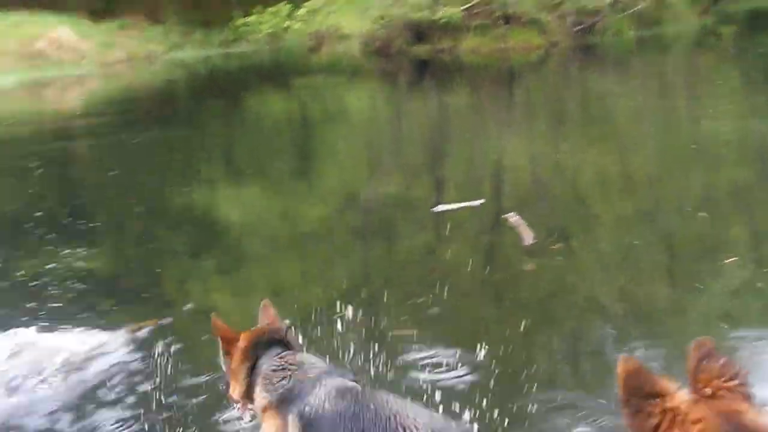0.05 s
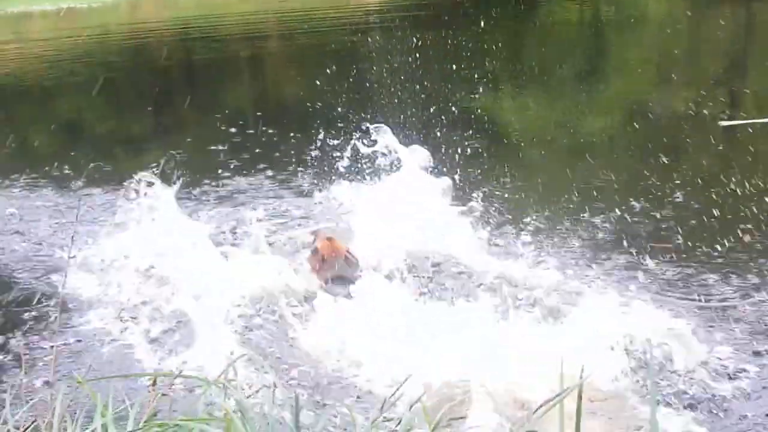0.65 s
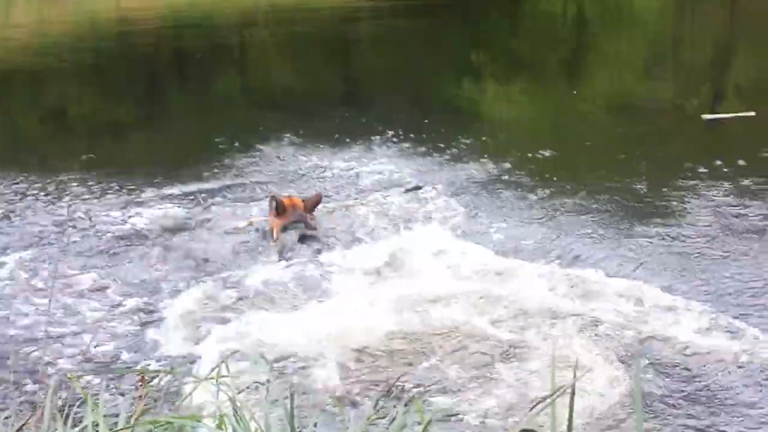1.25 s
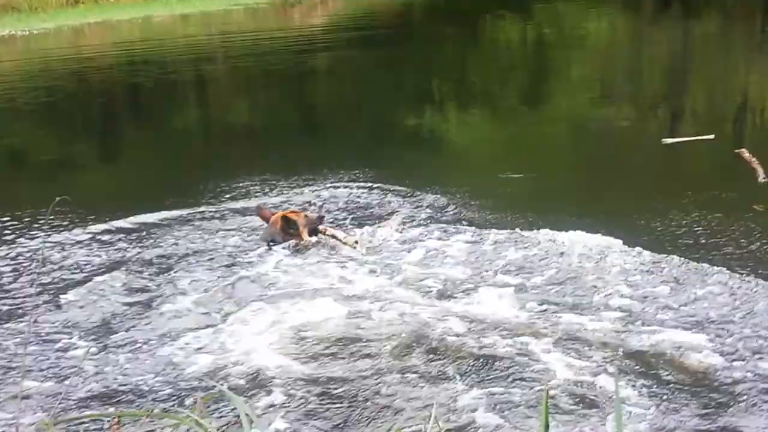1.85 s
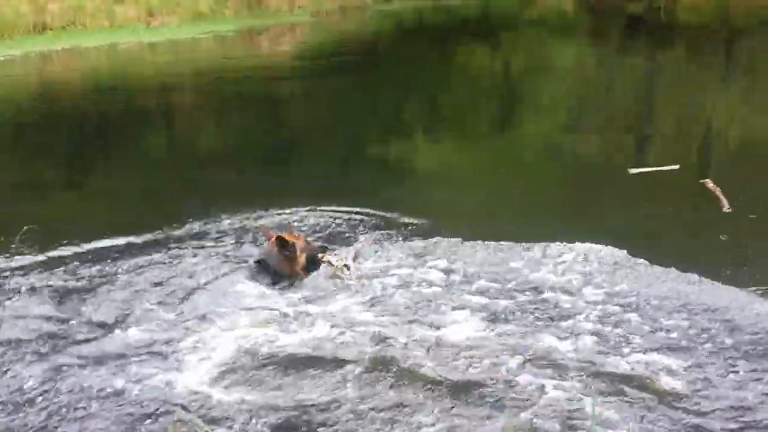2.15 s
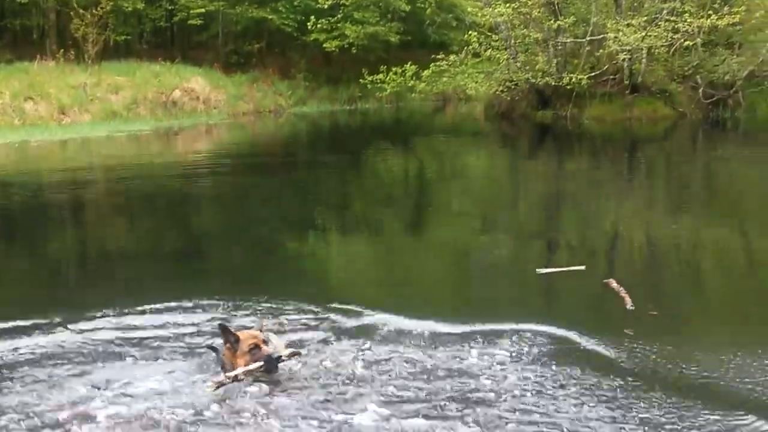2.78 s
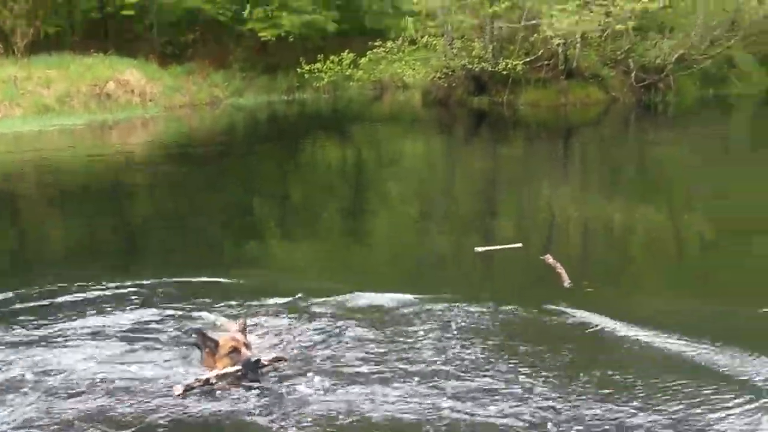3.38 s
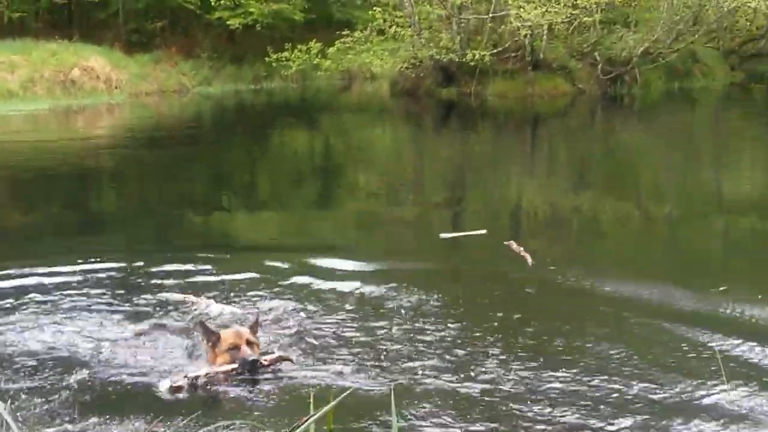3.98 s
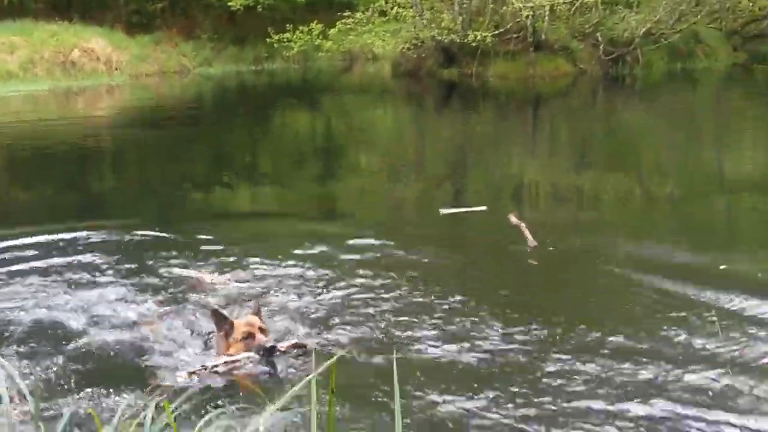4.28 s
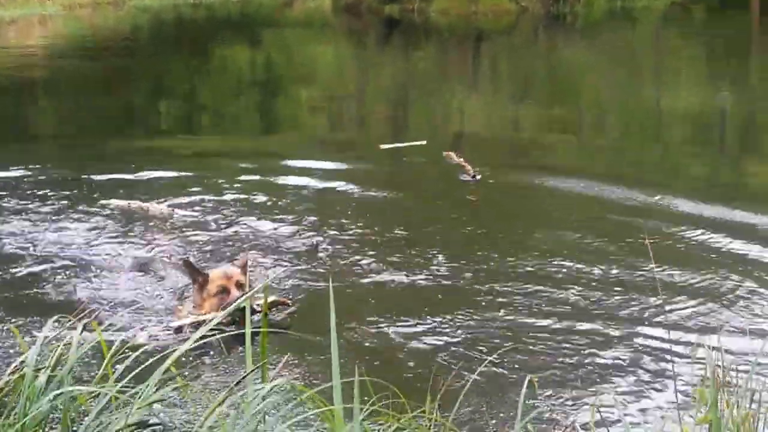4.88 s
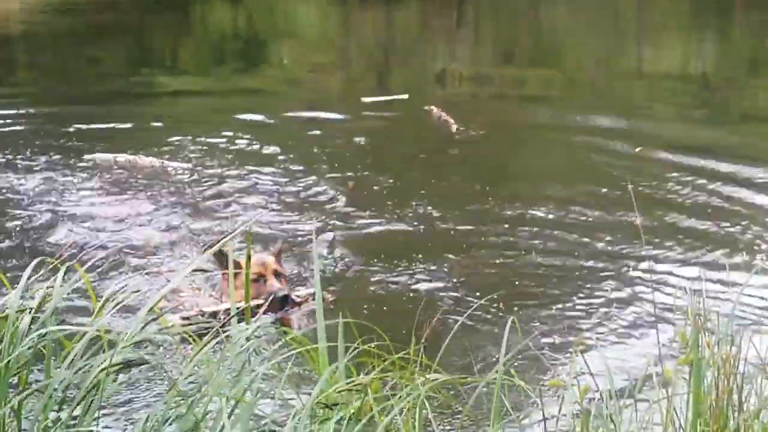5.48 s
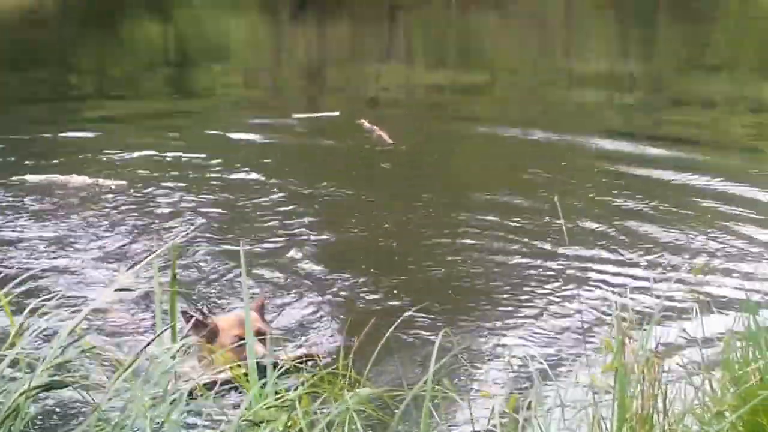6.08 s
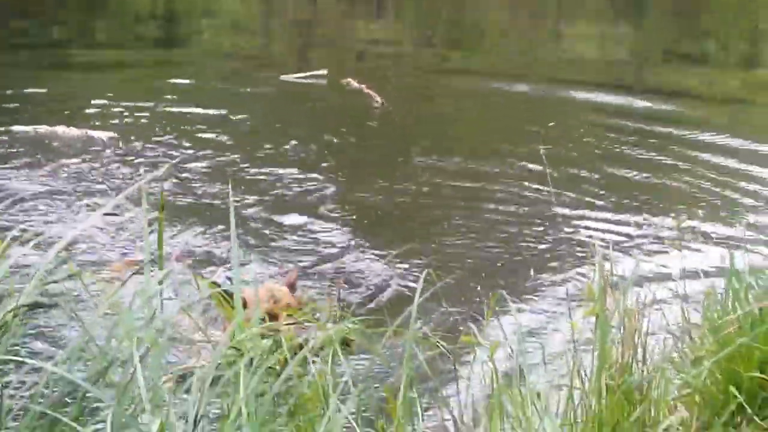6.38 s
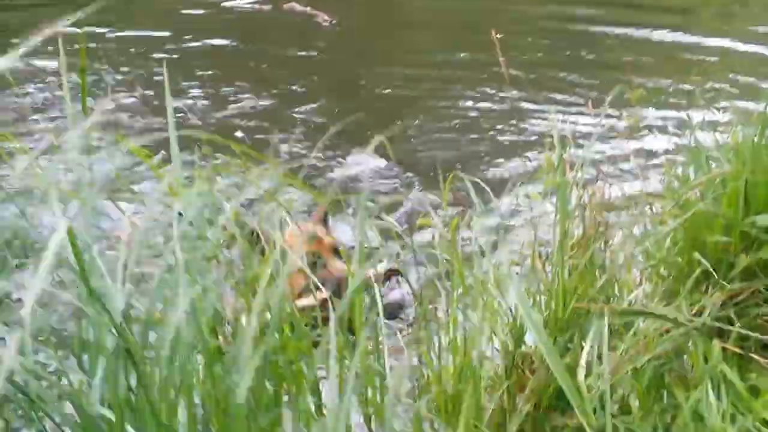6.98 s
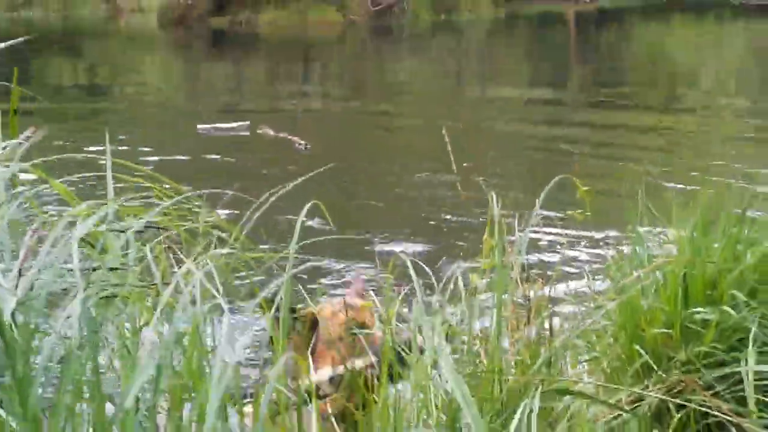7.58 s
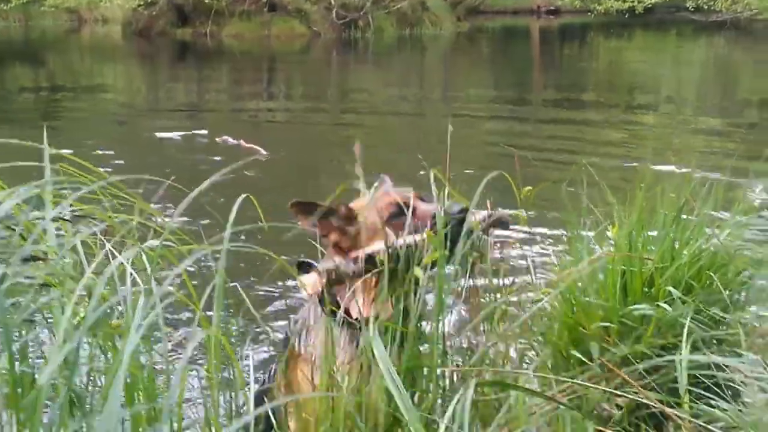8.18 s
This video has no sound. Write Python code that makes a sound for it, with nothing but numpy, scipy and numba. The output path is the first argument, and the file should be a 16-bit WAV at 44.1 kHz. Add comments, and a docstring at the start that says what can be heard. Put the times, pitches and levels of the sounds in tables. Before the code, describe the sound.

A dog plunges into a pond with a booming splash, then paddles back and sloshes through the shallows while distant birds whistle.

```python
"""A big, booming splash: a dog leaps into a forest pond, swims back and wades out through the reeds.
The plunge traps large air bubbles and throws up spray that patters down and fizzes away.
The wake laps, paws slap and gulp in the shallows, and two stems snap close by.
The water is mostly swarms of ringing bubbles and drops, swelling with each push of the dog.
Birds whistle far off over a soft rumble of forest air."""
import sys
import numpy as np
from scipy import signal
from scipy.fft import rfft, irfft, next_fast_len
from scipy.io import wavfile
from scipy.ndimage import map_coordinates
from numba import njit

SR = 44100
rng = np.random.default_rng(int(sys.argv[2]) if len(sys.argv) > 2 else 0)


def dump_mix(stems):
    """Bounce the given channels to the path in sys.argv[1] as a 16-bit WAV at rate SR."""
    frames = np.atleast_2d(stems).T  # one column per channel
    limited = np.clip(frames, -1, 1)  # hard clip at full scale
    pcm = np.round(limited * 32767).astype(np.int16)
    wavfile.write(sys.argv[1], SR, pcm)


N = 363516
TIME = np.arange(N) / SR


def amp(db):
    """Decibels to gain."""
    return 10 ** (np.asarray(db) / 20)


def unit(x):
    """Scales to rms 1."""
    return x / np.sqrt(np.mean(x ** 2) + 1e-20)


def eq_db(curve, hz):
    """Gain of an EQ curve, interpolated on a log-frequency axis."""
    freq_hz, gain_db = np.transpose(curve)
    return np.interp(np.log(hz + 1), np.log(freq_hz), gain_db)


def colour(x, curve):
    """Filters a sound through an EQ curve."""
    size = next_fast_len(x.shape[-1] + 512)
    gain = amp(eq_db(curve, np.fft.rfftfreq(size, 1 / SR)))
    return irfft(rfft(x, size) * gain, size)[..., :x.shape[-1]]


def add(mix, start_s, sound):
    """Mixes a sound in at a time."""
    part = mix[..., max(round(start_s * SR), 0):][..., :sound.shape[-1]]
    part += sound[..., :part.shape[-1]]


def wander(t, per_s):
    """A random drift of about unit size."""
    knots = rng.standard_normal(4096)
    return map_coordinates(knots, [t * per_s], order=1, mode="wrap")


def surge(t, start_s, rise_s, fall_db_per_s):
    """An envelope with a quick rise, then a steady fall in dB."""
    return np.clip((t - start_s) / rise_s, 0, 1) * amp(-fall_db_per_s * np.maximum(t - start_s, 0))


def forest_air(level_db=-55):
    """A soft, drifting rumble with a faint, wide hiss."""
    # tone of the distant air: freq_hz, gain_db
    air_eq = [(20, -22), (45, -5.5), (72, 6), (120, -1.5), (250, -8.5), (500, -11), (1000, -22),
              (2000, -16.5), (4000, -25), (8000, -28.5), (15000, -25.5)]
    centre = colour(rng.standard_normal(N), [(400, -4), (1500, 1.0), (4000, -10.5)])
    wide = colour(rng.standard_normal((2, N)), [(100, -2.5), (600, 7.5), (2000, 3.5)])
    return amp(level_db + 1.4 * wander(TIME, per_s=3.75)) * unit(colour(centre + wide, air_eq))


def forest_echo(x, t60_s):
    """Trunks and the far bank scatter a thin, dull stereo tail."""
    t = np.arange(SR) / SR
    taps = rng.standard_normal((2, SR)) * (rng.random((2, SR)) < .05)
    tail = taps * amp(-60 * t / t60_s) * (t > .012)
    tail = colour(tail, [(100, -9.0), (1000, 14.5), (5000, 13.5), (14000, -12)])
    return signal.fftconvolve(x[None], tail / np.linalg.norm(tail[0]), axes=1)[:, :N]


def twitter_notes(gap_s=.033, length_s=.0445, scatter=.16, glide=.12, buzz=.82):
    """Note rows for a bird's twitter: quick flicks up or down, scattered about a falling pitch."""
    # contour of the run: time_s, level_db, pitch_hz
    contour = [(2.33, -59.5, 4470), (2.85, -57.5, 4360), (3.1, -59, 4140), (3.25, -60.5, 3300),
               (3.85, -60, 3050), (4.2, -66, 2680)]
    time_s, level_db, pitch_hz = np.transpose(contour)
    beats = np.arange(time_s[0], time_s[-1], gap_s)
    late, detune, flick = rng.uniform(-1, 1, (200, 3))[:len(beats)].T
    starts = beats + late * gap_s / 2
    pitches = np.interp(beats, time_s, pitch_hz) * (1 + scatter * detune)
    return [(start_s, length_s, np.interp(start_s, time_s, level_db), hz * (1 + glide * way), hz, buzz)
            for start_s, hz, way in zip(starts, pitches, np.sign(flick))]


def birds():
    """Thin gliding whistles; a fast flutter of pitch makes some of them buzz."""
    # single calls: start_s, length_s, level_db, start_hz, end_hz, buzz (0-1)
    notes = [(3.37, .045, -54, 4340, 4620, 0.3), (3.565, 0.032, -52, 4390, 4570, 0.16),
             (3.774, .023, -51, 4500, 4620, .37), (3.81, 0.094, -57, 3660, 3500, 0.75),
             (4.295, 0.15, -62, 5420, 4850, 0.8), (4.537, .2, -58.5, 3220, 3440, 1),
             (4.985, 0.16, -54.5, 3850, 3510, 0.05), (5.14, 0.13, -60, 3540, 3470, 0.07),
             (5.18, .07, -67, 4970, 5100, 0.5), (5.31, .11, -67, 7450, 7050, .1)]
    out = np.zeros(N)
    for start_s, length_s, level_db, start_hz, end_hz, buzz in notes + twitter_notes():
        t = np.arange(int(length_s * SR)) / SR
        flutter = .07 * buzz * wander(t, per_s=700)
        glide_hz = end_hz + (start_hz - end_hz) * (1 - t / length_s) ** 3  # slides, then settles
        whistle = np.sin(2 * np.pi * np.cumsum(glide_hz * (1 + flutter)) / SR)
        add(out, start_s, amp(level_db) * unit(whistle * signal.windows.tukey(len(t), .6)))
    return out


def stem_snaps(lag_s=.0003, right_db=-4, tear_db=-7):
    """A stem on the left breaks: fibres tear in one dry crack that rings its modes for a moment."""
    # breaking stems: start_s, level_db
    snaps = [(7.0217, 1), (7.471, -4)]
    # modes of a stem: pitch_hz, level_db, t60_s
    modes = [(600, -35, 0.0034), (1690, -8, 0.0051), (4200, -24, .002), (5350, 1, 0.0021),
             (7500, 7.5, 0.0012), (10700, -14, 0.0016)]
    t, out = np.arange(600) / SR, np.zeros((2, N))
    ring = sum(amp(db - 60 * t / t60_s) * np.sin(2 * np.pi * hz * t) for hz, db, t60_s in modes)
    for start_s, level_db in snaps:
        tear = amp(tear_db) * rng.standard_normal(len(t)) * np.exp(-t / .00055)
        crack = amp(level_db) * (ring + tear) * (1 - np.exp(-t / .0001))
        add(out[0], start_s, crack)
        add(out[1], start_s + lag_s, amp(right_db) * crack)
    return out


def gulps():
    """Hollows round the legs slide down in pitch as they open and up as they fill."""
    # start_s, length_s, level_db, start_hz, end_hz
    hollows = [(3.076, 0.017, -40.5, 650, 2200), (5.536, 0.14, -56, 357.4, 854),
               (5.872, 0.029, -43, 200, 280), (4.075, .052, -41, 370, 760), (4.074, 0.017, -40.5, 217, 290),
               (5.845, 0.027, -40.5, 113, 190), (5.871, 0.075, -45.5, 508, 923),
               (6.21, 0.091, -48, 727, 918), (7.418, 0.126, -44.5, 648, 752), (7.719, 0.076, -43, 127, 103),
               (7.765, 0.057, -47, 610, 915), (7.851, .07, -45.5, 158, 526),
               (8.12, .082, -41, 388.6, 138.5), (8.168, 0.034, -34.5, 135, 260),
               (8.179, 0.038, -31.5, 534, 790), (8.202, .021, -31.5, 990, 1260)]
    out = np.zeros(N)
    for start_s, length_s, level_db, start_hz, end_hz in hollows:
        t = np.arange(int(length_s * SR)) / SR
        turns = np.cumsum(np.geomspace(start_hz, end_hz, len(t))) / SR
        slosh = 1 + .4 * (wander(t, per_s=200) + 1j * wander(t, per_s=200))  # shakes level and phase
        tone = (slosh * np.exp(2j * np.pi * turns)).imag
        add(out, start_s, amp(level_db) * unit(tone * signal.windows.tukey(len(t), .7)))
    return out


def bubble(hz, glide, decay_s):
    """Trapped air rings as a dying sine; its pitch moves by the share `glide` per decay time."""
    t = np.arange(int(6 * decay_s * SR) + 8) / SR
    turns = hz * (t + glide * t ** 2 / (2 * decay_s))
    return np.sin(2 * np.pi * turns) * np.exp(-t / decay_s) * (1 - np.exp(-4 * hz * t))


def plops(pockets, boom_db=6, boom_cycles=2.2):
    """Air pockets boom and sag in pitch; single bubbles pinch off and chirp up as they near the surface."""
    # the loudest single bubbles: start_s, level_db, pitch_hz, decay_s
    bubbles = [(.14, -26, 795, 0.0017), (.193, -17, 690, 0.0045), (.222, -11, 680, 0.0034),
               (.279, -23, 516, 0.02), (.347, -16, 592, 0.02), (.372, -21, 459, 0.023),
               (.445, -20.5, 441, 0.014), (.606, -17.5, 636, 0.01), (2.197, -34, 530, 0.006),
               (3.077, -30, 727, 0.0056), (3.162, -28.5, 663, 0.0057), (4.015, -27.5, 700, 0.0066),
               (3.113, -34, 670, .0051), (3.43, -39, 1460, .008), (6.616, -33.5, 860, .0064),
               (6.833, -32.5, 533, 0.0066), (4.42, -42, 1900, .006), (4.779, -48, 1260, 0.0058),
               (4.858, -38, 1420, 0.0048), (5.738, -41, 740, 0.009), (6.107, -37.5, 730, 0.0097),
               (4.907, -43, 1150, 0.0059), (5.409, -28, 250, .017), (5.441, -39, 1500, 0.0067),
               (5.668, -37, 1346, 0.015), (5.708, -31, 1420, 0.0047), (5.797, -24, 100, 0.0076),
               (5.868, -29, 259, .013), (5.869, -24.5, 570, 0.005), (5.902, -24, 670, 0.0029),
               (5.987, -32.5, 1340, 0.0087), (6.333, -30, 866, .0065), (6.469, -34, 1240, .01),
               (6.487, -32.5, 820, 0.012), (6.544, -35.5, 306, .021), (6.691, -31.5, 510, 0.0094),
               (7.045, -28.5, 980, 0.01), (7.199, -20, 1080, 0.0012), (7.368, -29.5, 240, 0.0093),
               (7.369, -24, 662, 0.0064), (7.671, -20.5, 333, .0028), (7.687, -22.5, 202, 0.005),
               (7.919, -29, 1166, 0.0063), (8.0035, -13.5, 1130, 0.003)]
    out = np.zeros(N)
    for start_s, level_db, hz in pockets:
        add(out, start_s, amp(level_db + boom_db) * bubble(hz, glide=-.045, decay_s=boom_cycles / hz))
    for start_s, level_db, hz, decay_s in bubbles:
        add(out, start_s, amp(level_db) * bubble(hz, glide=.059, decay_s=decay_s))
    return out


def slaps(ring_db=-1, hiss_db=-3, ring_width=.31, rise_share=.13):
    """A sheet of water hits: a dull thud, a burst of spray, and like-sized droplets ringing together."""
    # sheets of water: start_s, level_db, decay_s, thud_db (relative), droplet_hz
    sheets = [(0.074, -26, 0.014, -18, 6140), (0.1392, -14, 0.0038, -0.5, 5400),
              (.174, -21.5, 0.012, -8, 6440), (0.2187, -20.5, 0.0051, 4, 6460),
              (0.328, -26, 0.017, 4, 1370), (.9435, -23, 0.0044, -17, 5100), (1.5401, -30, .0024, -8, 3300),
              (2.327, -39, 0.007, -6.5, 3420), (2.972, -39, 0.0036, -15, 3170),
              (3.167, -42, 0.027, -3.5, 2420), (3.584, -41.5, .0059, -24, 2290),
              (4.764, -50, .0072, -16, 3680), (4.0605, -27.5, .0024, -14, 3630),
              (4.07, -41.5, 0.031, -1, 4100), (4.662, -41, 0.0073, -8, 3800),
              (5.273, -38, 0.0041, -7, 3040), (5.284, -39.5, 0.011, -11, 3220),
              (5.406, -40.5, 0.0064, -6, 3000), (5.547, -41, 0.0085, -6, 1670),
              (5.62, -36, 0.0048, 1, 1490), (5.637, -38.5, 0.013, -12, 4350),
              (5.778, -45.5, 0.011, 7.5, 3000), (5.794, -34, 0.0053, 2.5, 1540),
              (6.109, -38.5, 0.0065, -8, 3050), (6.199, -37, 0.0058, -23, 3200),
              (6.2576, -32.5, 0.0043, -13, 3150), (6.269, -28.5, 0.0076, -8.5, 3100),
              (6.339, -35.5, 0.018, -6, 3200), (6.916, -35.5, 0.0072, -5, 5970),
              (7.953, -37, .0025, -19, 12500), (7.297, -33.5, 0.019, -5.5, 5700),
              (7.3685, -38.5, 0.026, 1, 2800), (7.4165, -26, 0.0024, -10, 5950),
              (7.638, -31, 0.017, 1, 3250), (7.7114, -20, 0.0016, -21, 4050),
              (7.744, -34.5, 0.027, -1, 1160), (8.0384, -28.5, .0014, -14, 7100),
              (8.124, -32, 0.039, -12.5, 6200), (8.178, -16, .014, -11, 4950)]
    grit = rng.standard_normal((2, N)) * amp(2.0 * rng.standard_normal(N))
    hiss = unit(colour(grit, [(500, -13), (1500, -1), (3200, 3), (6000, 2), (8500, -1), (14500, -14)]))
    thud_eq = [(70, -30), (220, -1.5), (600, 2.5), (1500, -7), (2500, -8.5), (6000, -51)]
    thud = unit(colour(rng.standard_normal(N), thud_eq))
    t, out = np.arange(SR // 3) / SR, np.zeros((2, N))
    for start_s, level_db, decay_s, thud_db, droplet_hz in sheets:
        attack = 1 - np.exp(-(t / (rise_share * decay_s)) ** 2)  # broad sheets land softly
        envelope = attack * np.exp(-t / decay_s)
        span = slice(round(start_s * SR), round(start_s * SR) + len(t))
        ring = unit(signal.lfilter(*signal.iirpeak(droplet_hz, 1 / ring_width, fs=SR), grit[:, span]))
        hit = amp(hiss_db) * hiss[:, span] + amp(ring_db) * ring + amp(thud_db) * thud[span]
        add(out, start_s, amp(level_db) * hit * (envelope / envelope.max())[:hit.shape[1]])
    return out


@njit
def ring_out(onsets, lags, hz, height, cycles, rise, length, rate):
    """Adds up dying, rising sines; each reaches the right side its own lag, in samples, after the left."""
    out = np.zeros((2, length))
    for k in range(len(onsets)):
        for i in range(int(5 * cycles * rate / hz[k])):
            age = i * hz[k] / rate  # in cycles
            value = height[k] * np.sin(2 * np.pi * age * (1 + rise * age / (2 * cycles)))
            value *= np.exp(-age / cycles) * min(3 * age, 1.)
            for side in range(2):
                j = onsets[k] + i + side * lags[k]
                if 0 <= j < length:
                    out[side, j] += value
    return out


def swarm(low_hz, high_hz, per_s, cycles, rise, spread_db, width_s):
    """Many bubbles or drops, each of its own size and from its own direction."""
    gap, pitch, size, sign, place = rng.random((90000, 5)).T
    onsets = np.cumsum(-np.log(1 - gap)) / per_s * SR
    hz = low_hz * (high_hz / low_hz) ** pitch
    strength = amp(spread_db * np.minimum(-np.log(1 - size), 3.5))
    height = strength * np.sign(sign - .5) * hz  # small ones are brief but sharp
    lags = np.round((2 * place - 1) * width_s * SR).astype(int)
    return unit(ring_out(onsets[onsets < N].astype(int), lags, hz, height, cycles, rise, N, SR))


def stirring(pockets, plunge_s=.244, stroke_rise_s=.045, stroke_fall_s=.058):
    """Envelopes of boom, churn, spray and fizz: plunge, wake, pockets, showers and strokes add in power."""
    # the plunge, a row per layer; big bubbles die first, foam lasts: level_db, fall_db_per_s
    settling = [(-24.5, 28), (-27.5, 14.5), (-39.5, 5), (-45, 5)]
    # the wake, lapping louder in the shallows: time_s, level_db
    wake = [(2.3, -60), (3.9, -55.5), (4.25, -61), (5.0, -69.5), (5.48, -60.5), (5.66, -52.5), (6.55, -54),
            (6.95, -46), (7.55, -48.5), (7.88, -49), (8.24, -43.5)]
    # thrown water landing, or a crest breaking: peak_s, spread_s, level_db, fine_db (tilt to fizz)
    showers = [(.01, 0.023, -37, -4.5), (.1, 0.083, -38, 6), (.195, 0.055, -35, 2), (.35, 0.13, -33, -1),
               (.68, 0.12, -33, 0), (0.929, 0.1, -31, -0.5), (1.2, 0.23, -43, -4), (1.5, 0.079, -45, 4.5),
               (1.7, 0.2, -51, -7), (2.07, 0.09, -51, 14), (2.32, .035, -48.5, 8), (2.92, 0.084, -60, 15)]
    # paddling and wading, one swell each: peak_s, level_db, deep_db (tilt to boom)
    strokes = [(2.58, -48.5, 12), (3.12, -56, 6), (3.6, -62.5, -3), (4.0, -49.5, 1), (4.41, -57, 2),
               (4.75, -56, -1), (5.22, -60.5, -2), (5.66, -60, -13), (5.96, -48, 1), (6.25, -50, -2.5),
               (6.42, -55.5, -3), (6.55, -49.5, 7), (6.69, -45, 5), (6.86, -45.5, 8), (7.01, -44, 6),
               (7.13, -39.5, 4.5), (7.43, -44.5, -2.5), (7.7, -38, -2.5), (8.02, -38.5, 0), (8.22, -34, 3)]
    # sends to the four layers: boom_db, churn_db, spray_db, fizz_db
    wake_sends = [-5.5, -1, 1, -9.5]
    pocket_sends = [-4, -8, -17, -30]
    shower_sends = [-14, -1, 1.5, -9.5]
    stroke_sends = [-13.5, 2, -5, -15.5]
    t = TIME[::32]
    plunge = [amp(db) * surge(t, plunge_s, rise_s=.017, fall_db_per_s=fall) for db, fall in settling]
    lapping = amp(np.interp(t, *np.transpose(wake)))
    parts = [np.array(plunge), np.outer(amp(wake_sends), lapping)]
    for start_s, level_db, _ in pockets:
        collapse = surge(t, start_s, rise_s=.005, fall_db_per_s=302)
        parts.append(np.outer(amp(pocket_sends), amp(level_db) * collapse))
    for peak_s, spread_s, level_db, fine_db in showers:
        sends = amp(shower_sends) * amp([-fine_db, -fine_db, 0, fine_db])
        parts.append(np.outer(sends, amp(level_db) * np.exp(-.5 * ((t - peak_s) / spread_s) ** 2)))
    for peak_s, level_db, deep_db in strokes:
        sends = amp(stroke_sends) * amp([deep_db, 0, -deep_db, -deep_db])
        spread_s = np.where(t < peak_s, stroke_rise_s, stroke_fall_s)
        parts.append(np.outer(sends, amp(level_db) * np.exp(-.5 * ((t - peak_s) / spread_s) ** 2)))
    return [np.interp(TIME, t, layer) for layer in np.sqrt(sum(part ** 2 for part in parts))]


def water(pockets, calm_from_s=2, calm_by_s=2.9, plip_cap_db=-50):
    """Swarms of bubbles and drops follow the stirring; the roar of the splash gives way to lapping."""
    # tone of each layer: freq_hz, gain_db
    boom_eq = [(40, -32), (65, -5), (115, 7), (175, 7), (260, 0.5), (340, -14), (550, -1)]  # big bubbles dragged deep
    shallow_eq = [(50, -21), (90, -5), (170, -3), (260, -1), (350, -6.5), (550, -45)]  # big bubbles near the surface
    churn_eq = [(40, -70), (180, -18), (320, -4), (550, 4), (820, -1.5), (1020, -5), (1280, -6), (1800, -7),
                (2300, -11.5), (3500, -24), (9000, -65)]  # small bubbles in the splash
    lapping_eq = [(180, -13), (320, -9), (520, -2), (780, -1), (1100, -5.5), (1550, -2.5), (2100, -10),
                  (3500, -20)]  # small bubbles in calmer water
    spray_eq = [(200, -53), (1200, 4), (2100, -2.5), (3000, -1), (4200, 0.5), (5500, 1.5), (6800, -1),
                (8000, -6), (10500, -9.5), (14000, -40)]  # drops from the splash
    trickle_eq = [(200, -55), (1200, -4), (2100, -5.5), (2600, -1.5), (3200, 0), (4200, 0.5), (5500, 0.5),
                  (6700, -1), (8000, -8), (12000, -16)]  # drops among the reeds
    fizz_eq = [(3000, -31), (5500, 6), (8000, 2), (10000, 0), (12000, -1), (14300, -2.5), (15500, -57)]  # foam
    boom, churn, spray, fizz = stirring(pockets)
    calm = np.interp(TIME, [calm_from_s, calm_by_s], [0, 1])
    clumps = wander(TIME, per_s=70) * (.4 + .55 * calm)
    big = swarm(69.7, 377, per_s=350, cycles=1.68, rise=.057, spread_db=2, width_s=.00032)
    small = swarm(301, 2414, per_s=1300, cycles=4.1, rise=.05, spread_db=2.5, width_s=.00022)
    drops = swarm(1854, 9050, per_s=4500, cycles=3.0, rise=.038, spread_db=-1.5, width_s=.0005)
    foam = swarm(7050, 13000, per_s=5000, cycles=.42, rise=.028, spread_db=1.5, width_s=.0005)
    # in calmer water single bubbles stand out, each with a quick upward chirp
    plips = swarm(518, 1966, per_s=32, cycles=8.7, rise=.168, spread_db=3.5, width_s=.00017)
    drips = swarm(2297, 7320, per_s=75, cycles=13.8, rise=.06, spread_db=-2, width_s=.00026)
    wash = rng.standard_normal((2, N))  # countless drops merge into an even hiss
    depth = np.minimum(boom / amp(-17), 1)  # only a hard push drags air deep
    booming = depth * unit(colour(big, boom_eq)) + (1 - depth) * unit(colour(big, shallow_eq))
    roar = (1 - calm) * unit(colour(small + 1.5 * wash[0] + 1.5 * wash, churn_eq))
    lapping = calm * amp(-.1) * unit(colour(small, lapping_eq))
    patter = (1 - calm) * unit(colour(drops + 1.2 * wash, spray_eq))
    trickle = calm * amp(-.6) * unit(colour(drops + 1.27 * wash, trickle_eq))
    dripping = calm * amp(-9) * unit(colour(drips, [(2500, -12), (7500, -19)]))
    plipping = calm * amp(-2.5) * unit(colour(plips, lapping_eq))
    return (boom * amp(-.5 - 2.5 * calm) * booming
            + churn * amp(-.18 + 1.6 * clumps) * (roar + lapping)
            + np.minimum(churn, amp(plip_cap_db)) * plipping
            + spray * amp(4 + 1.9 * clumps) * (patter + trickle + dripping)
            + fizz * amp(6 + 1.4 * clumps) * unit(colour(foam, fizz_eq)))


def place_pond(x):
    """The shaded left side loses treble, and the delay between the sides shifts as the dog moves."""
    # full shade on the left: freq_hz, gain_db
    shade_eq = [(200, -0.6), (700, -4), (1300, -7.5), (2400, -9.5), (4400, -29), (8000, -36.5),
                (11000, -20.5), (15000, -5)]
    # how much of that cut applies: time_s, share
    shade_depth = [(0, 0.65), (1.5, 0.54), (2.2, 0.51), (3.2, 0.43), (4.2, 0.38), (5.5, 0.39), (6.4, 0.32),
                   (6.9, 0.42), (7.5, 0.42), (8.2, 0.58)]
    # how much later the right side hears the water: time_s, lag_samples
    lag = [(0, -8), (1.8, 4.5), (2.6, 12), (8.2, 7.5)]
    hz, t, spectrum = signal.stft(x[0], SR, nperseg=256)
    shade_db = eq_db(shade_eq, hz)[:, None] * np.interp(t, *np.transpose(shade_depth))
    left = signal.istft(spectrum * amp(shade_db), SR, nperseg=256)[1][:N]
    delayed = np.arange(N) - np.interp(TIME, *np.transpose(lag))
    right = map_coordinates(x[1], [delayed], order=5, mode="nearest")
    return np.array([left, right])


def scene():
    """Water and reeds close by, birds deep among the trees."""
    # air pockets that collapse behind the body, stirring and booming: start_s, level_db, pitch_hz
    pockets = [(.278, -20, 172), (.339, -14.5, 170), (.422, -21.5, 182), (.442, -17, 219),
               (.553, -22.5, 127), (.589, -26, 177), (.635, -28.5, 124), (.905, -33, 326),
               (1.057, -39, 170), (1.1, -37, 190), (1.2, -45, 230)]
    pond = water(pockets) + slaps() + plops(pockets) + gulps()
    song = birds()
    song = song + amp(-6) * forest_echo(song, t60_s=.7)
    pond = pond + amp(-17.5) * forest_echo(pond.mean(0), t60_s=.36)
    return place_pond(pond) + stem_snaps() + forest_air() + song


def record(dry):
    """A low cut, soft clipping on the sharpest cracks, and a steep high cut."""
    low_cut_hz, high_cut_hz, ceiling = 46, 14900, .9
    trimmed = signal.sosfilt(signal.butter(3, low_cut_hz, "high", fs=SR, output="sos"), dry)
    clipped = ceiling * np.tanh(trimmed / ceiling)
    high_cut = signal.firwin(401, high_cut_hz, window=("kaiser", 9), fs=SR)
    return signal.oaconvolve(clipped, high_cut[None], "same", axes=1)


dry = scene()
out = record(dry)
dump_mix(out)
```